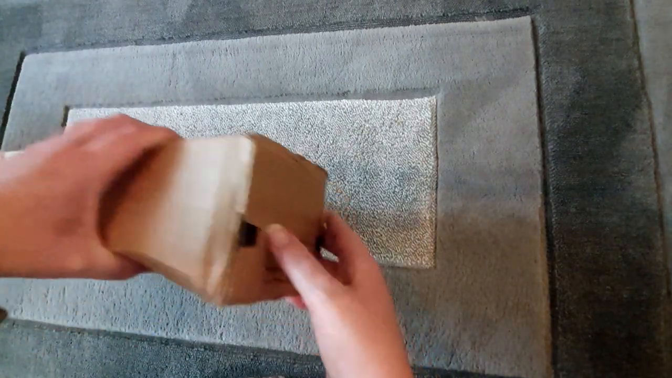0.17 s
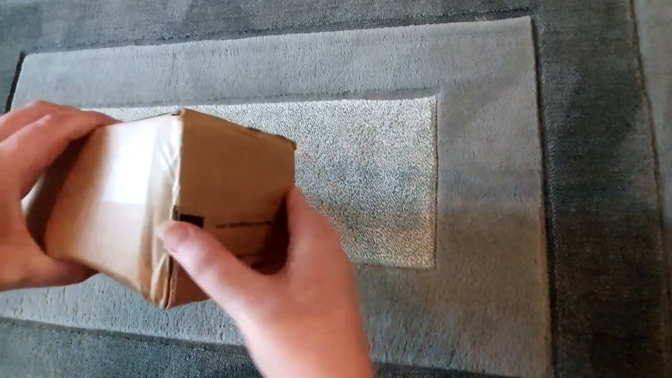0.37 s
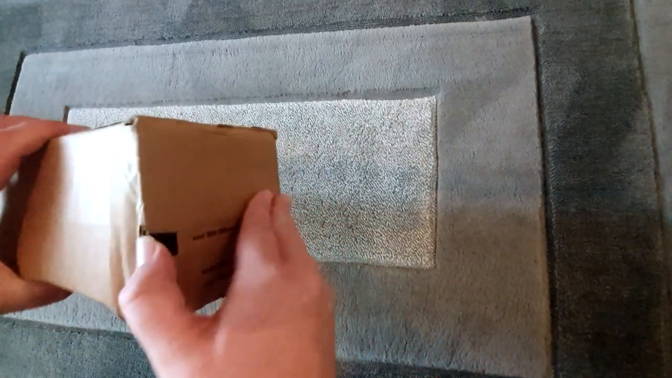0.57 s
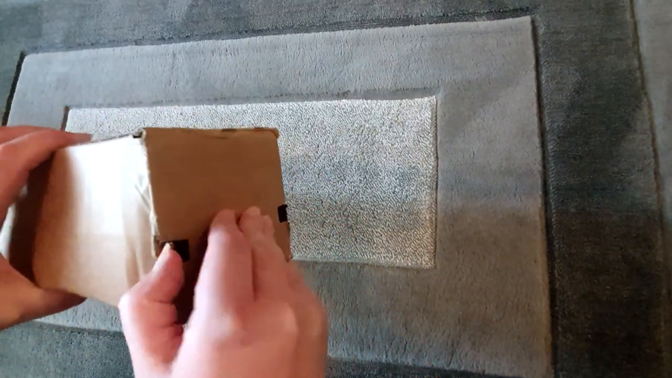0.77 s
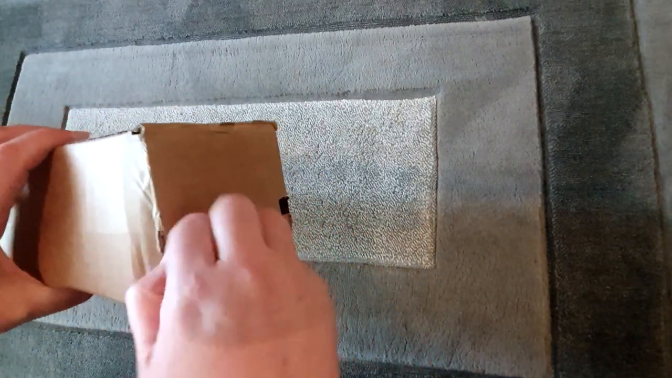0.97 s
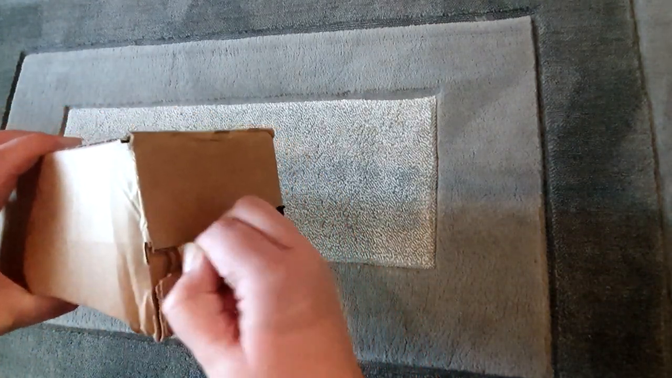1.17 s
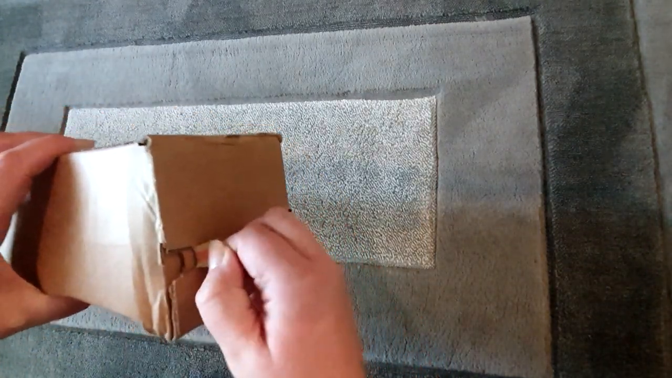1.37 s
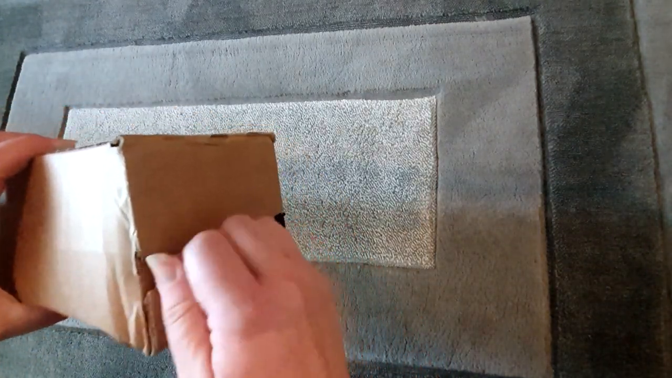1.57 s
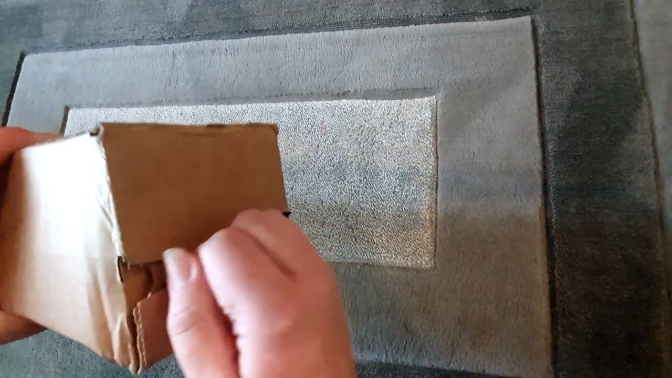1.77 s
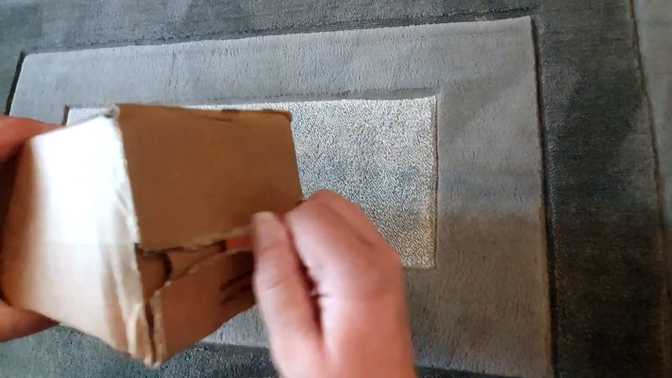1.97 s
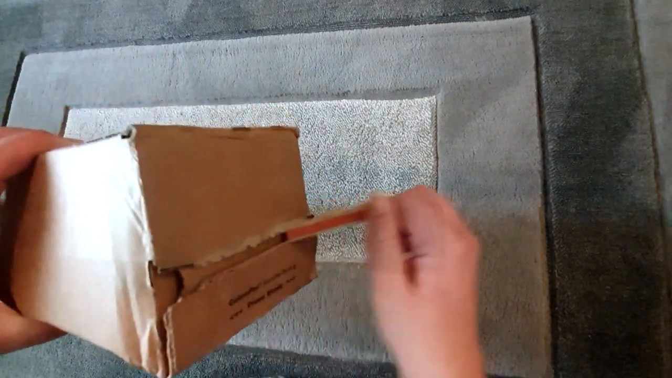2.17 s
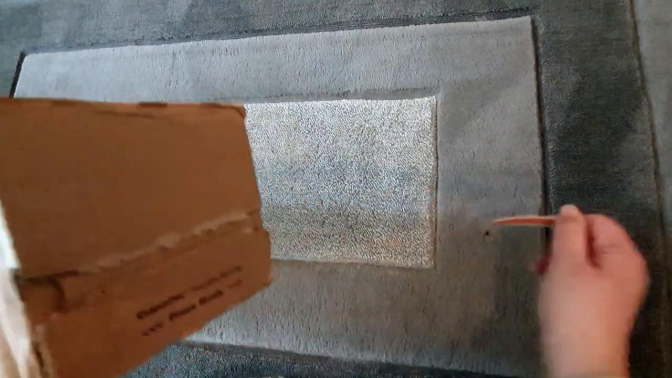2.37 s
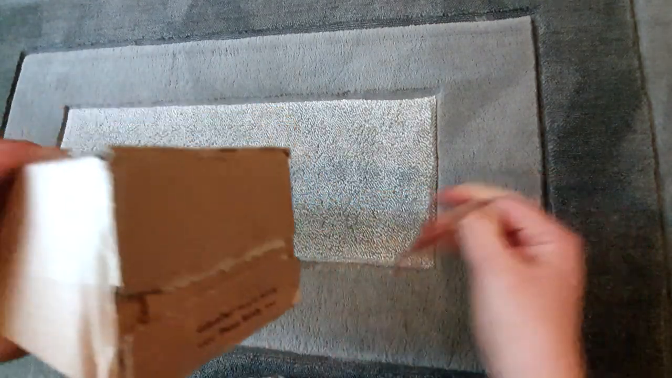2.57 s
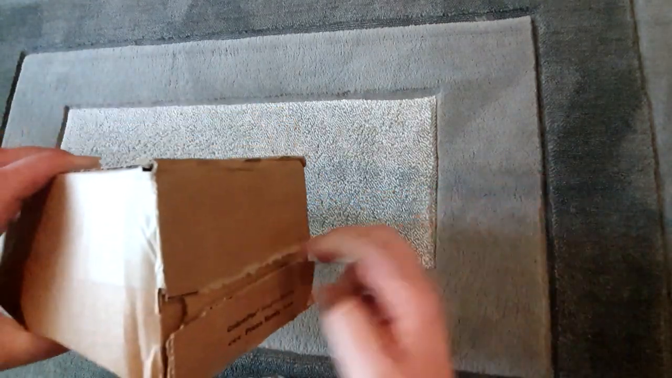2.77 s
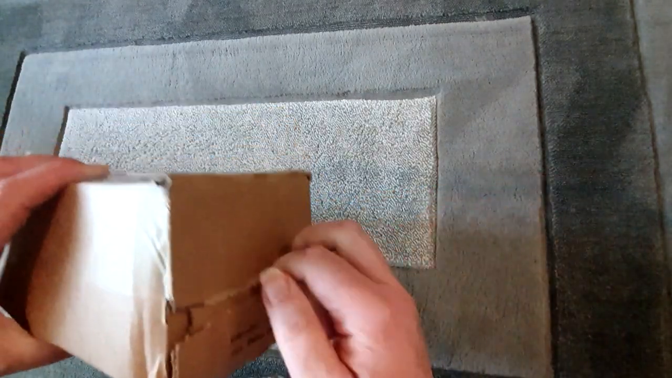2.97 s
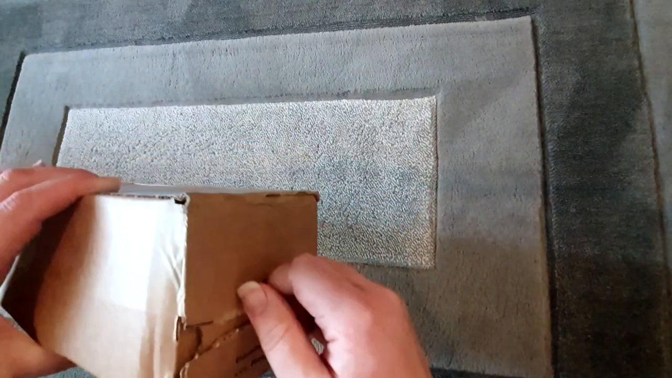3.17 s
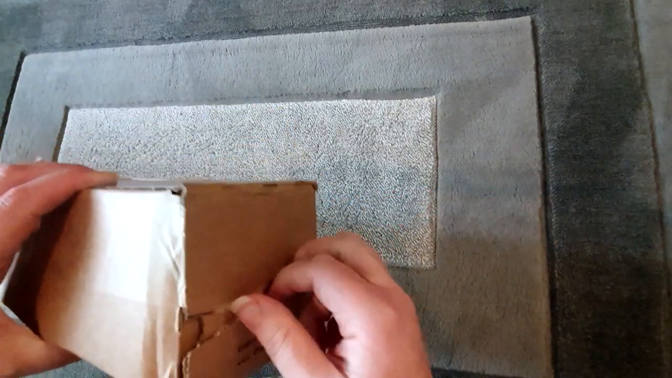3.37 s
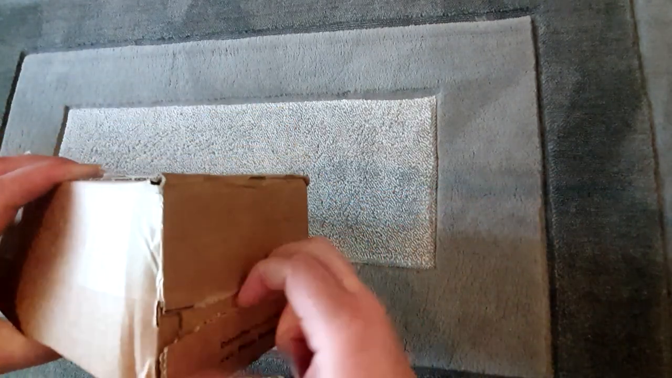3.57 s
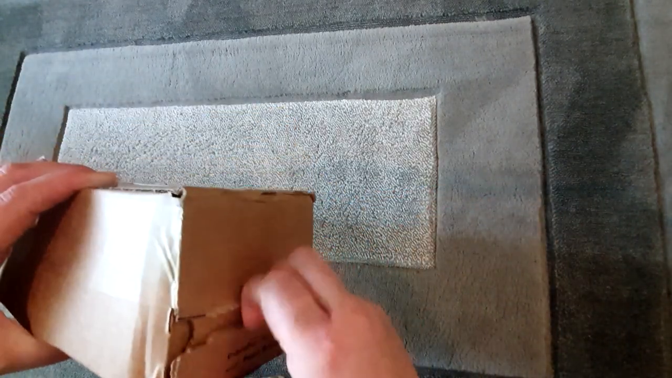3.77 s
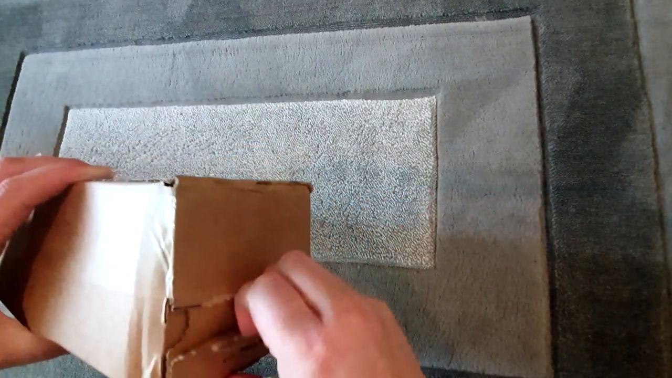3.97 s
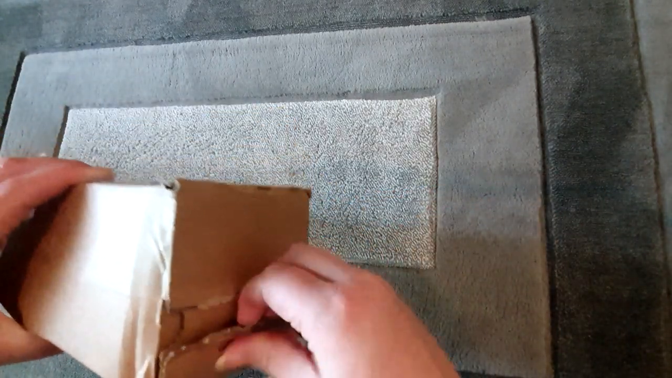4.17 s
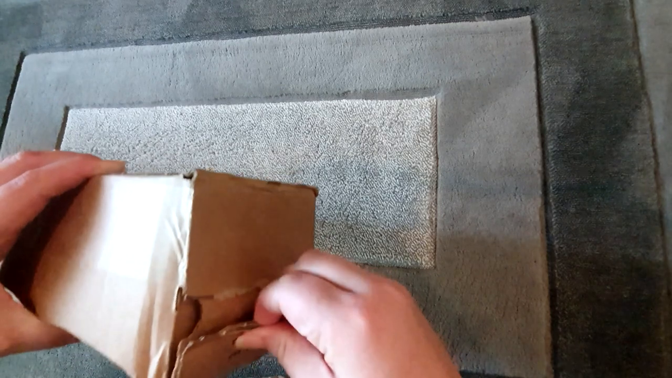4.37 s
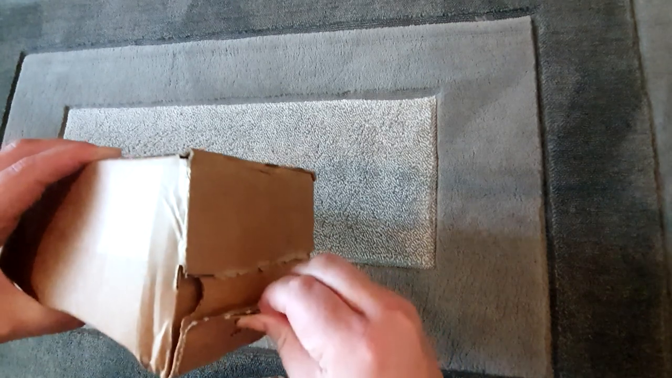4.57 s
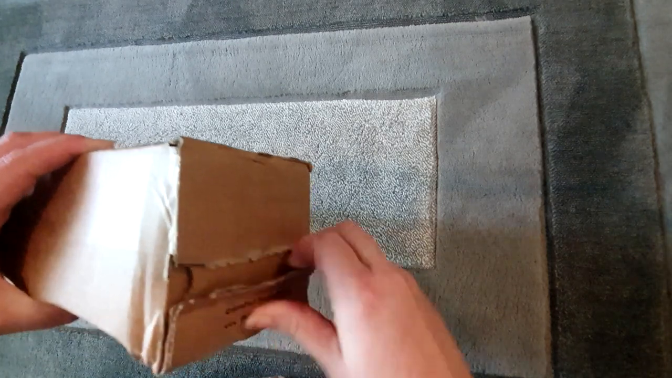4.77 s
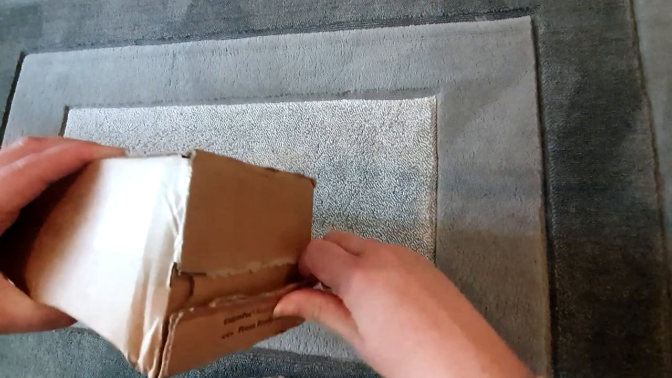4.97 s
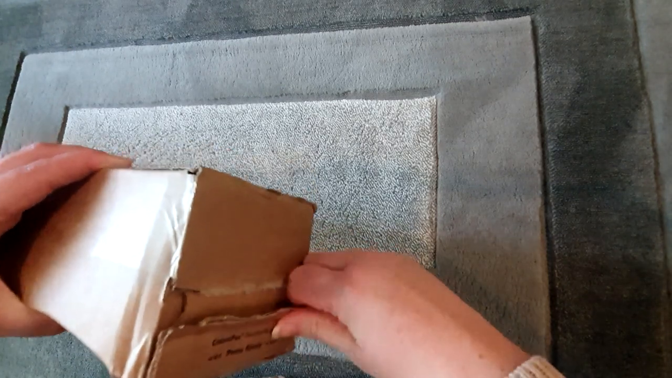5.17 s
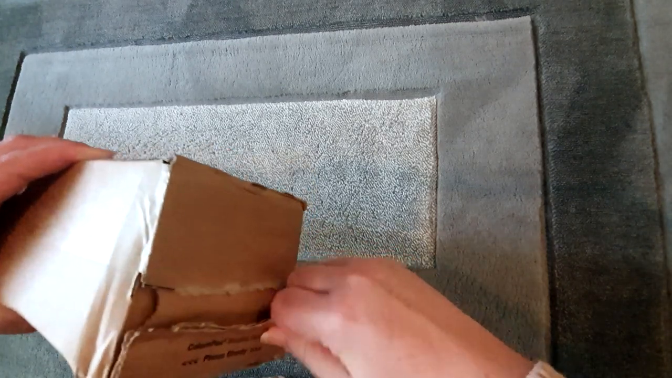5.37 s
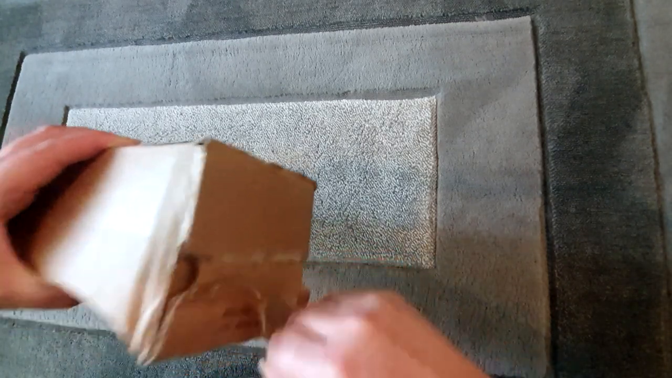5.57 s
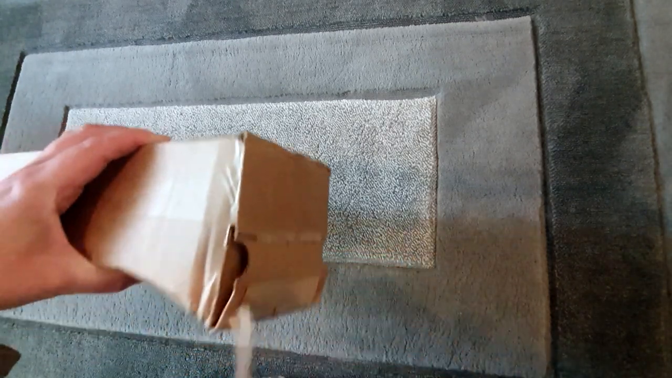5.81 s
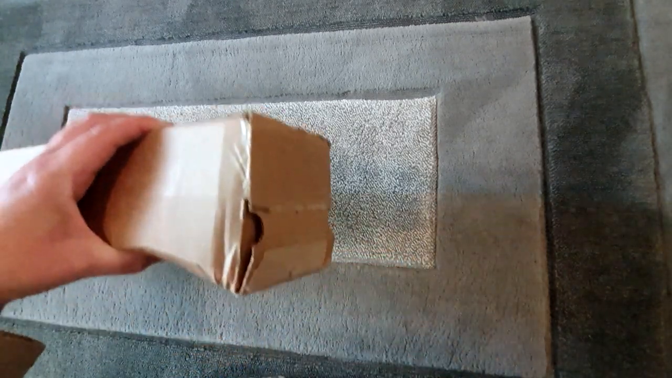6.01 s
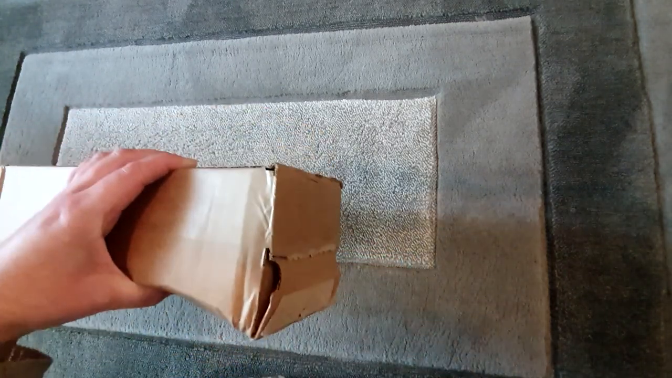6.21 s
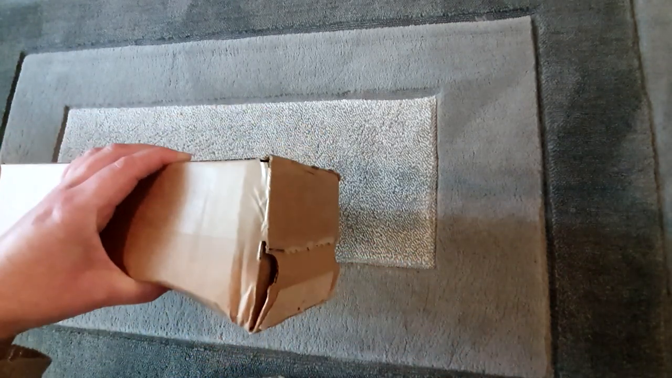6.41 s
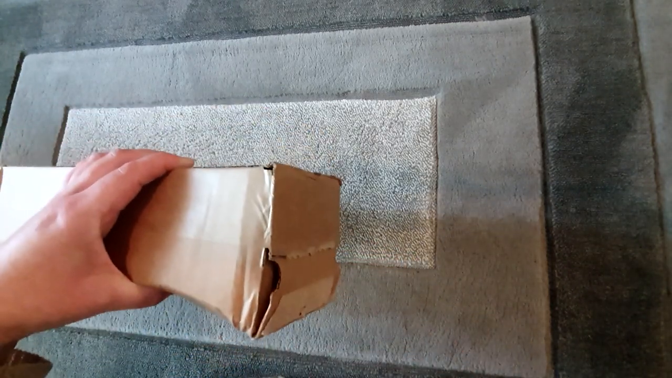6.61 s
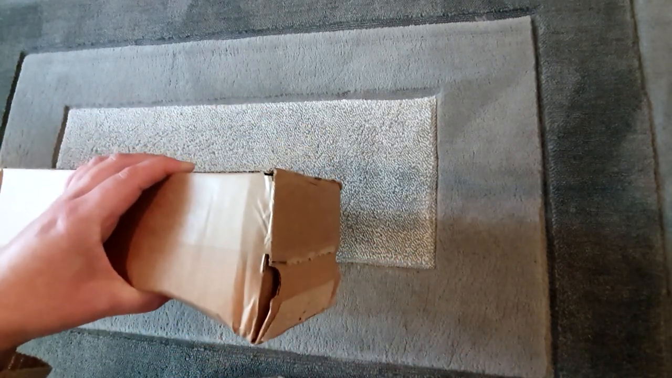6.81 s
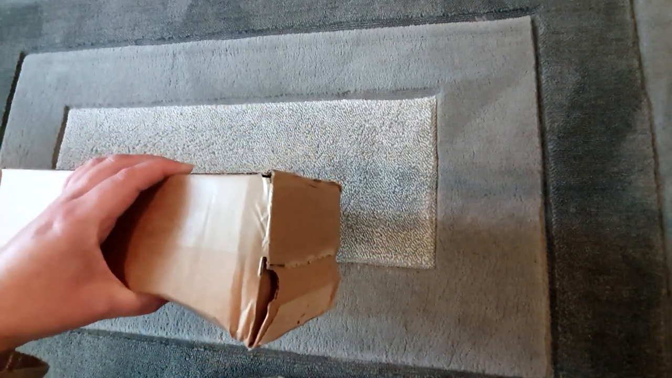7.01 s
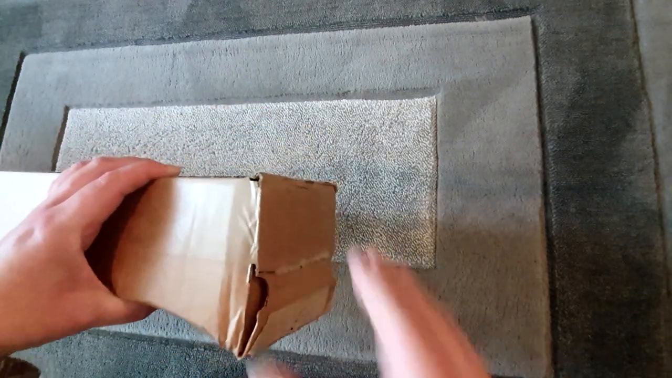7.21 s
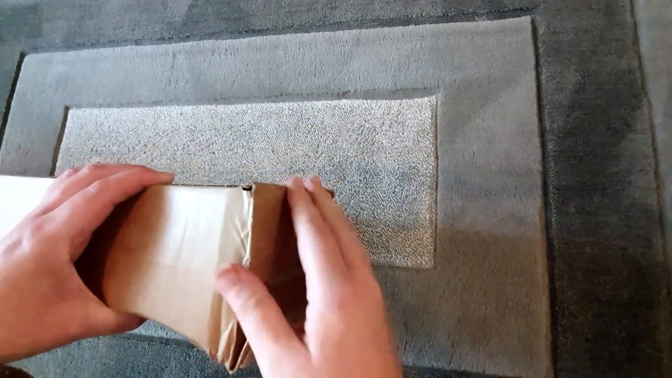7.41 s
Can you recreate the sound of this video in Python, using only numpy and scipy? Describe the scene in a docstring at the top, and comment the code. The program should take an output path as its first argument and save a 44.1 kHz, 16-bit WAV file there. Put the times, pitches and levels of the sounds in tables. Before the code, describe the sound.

Fingers tap and rustle on a hollow carton, a strip tears away in rapid drumming snaps, later two short crunchy rips follow.

```python
"""A small cardboard box is torn open by hand, close to two microphones: touches, a tear strip, two rips of the flap.
Breaking fibres are shaped noise: single snaps, dry ticks and a continuous crackle in clumps.
Snaps, jolts and scrapes excite the damped modes of the hollow box and its panels, which knock, thump and drum.
Low noise is the rumble of the grip; sparse decaying echoes are a small soft room over a faint hush of air."""
import sys
import numpy as np
from scipy import signal
from scipy.fft import rfft, irfft
from scipy.io import wavfile
from scipy.ndimage import uniform_filter1d

SR = 44100
rng = np.random.default_rng(int(sys.argv[2]) if len(sys.argv) > 2 else 0)


def to_wav(s):
    """Save 16-bit WAV."""
    ch = np.atleast_2d(s).T  # columns
    pcm = np.round(np.clip(ch, -1, 1) * 32767)  # PCM
    wavfile.write(sys.argv[1], SR, pcm.astype(np.int16))


N = 328545


def amp(db):
    """Logarithmic level: decibels become an amplitude ratio."""
    return 10 ** (np.asarray(db) / 20)


def evened(x):
    """Power normalisation: the signal is scaled to an rms of 1."""
    return x / np.sqrt(np.mean(x ** 2) + 1e-20)


def read(points, hz):
    """Logarithmic pitch: a table is interpolated along a log-frequency axis."""
    f, value = np.transpose(points)
    return np.interp(np.log(hz + 1), np.log(f + 1), value)


def add(mix, s, sound):
    """Superposition: a sound is summed into the mix at time s."""
    part = mix[..., round(s * SR):][..., :sound.shape[-1]]
    part += sound[..., :part.shape[-1]]


def colour(x, points):
    """Minimum-phase filtering: a spectrum is imposed that rings only after each click."""
    gain_db = np.maximum(read(points, abs(np.fft.fftfreq(4096, 1 / SR))), -100)
    # the Hilbert transform of the log gain supplies the phase
    response = np.exp(np.conj(signal.hilbert(np.log(amp(gain_db)))))
    taps = np.fft.ifft(response).real[:2048]
    return signal.oaconvolve(x, taps / np.linalg.norm(taps))[:len(x)]


def spread(count):
    """Partial coherence: noise for both ears shares a part, as the tear is spread along the edge."""
    shared, left, right = rng.standard_normal((3, count))
    return evened(np.array([shared + 2.6 * left, shared + 3.1 * right]))


# single snaps: start_s, crack_peak_db, panel_knock_peak_db, hollow_thump_peak_db, thump_pitch_hz
# (crack peak: before its tick and the dulling)
SNAP_EVENTS = [(0.0005, -37, -66, -28.5, 177), (0.0115, -22.5, -32, -21.5, 187),
               (0.548, -24, -36, -42.5, 271), (0.624, -37, -30.5, -41, 296), (0.8163, -23, -33, -38, 154),
               (0.9143, -40, -41, -44, 288), (0.9543, -57, -31, -31.5, 176), (0.98, -33, -51, -35, 277),
               (1.0218, -18.5, -19.5, -25, 258), (1.263, -71, -54, -45, 244), (1.352, -19, -27, -33.5, 192),
               (1.4553, -37, -34, -45.5, 150), (1.6261, -36, -56, -40, 303), (1.6753, -31, -33.5, -40, 308),
               (1.6931, -26, -30.5, -54.5, 298), (1.7878, -16.5, -25, -33.5, 404),
               (1.819, -16, -34, -27.5, 298), (1.834, -17, -20, -21, 295), (1.8737, -15, -27, -17, 148),
               (1.9, -14, -28, -21, 298), (1.929, -15, -29.5, -16.5, 290), (1.9905, -13.5, -33, -16.5, 300),
               (2.0765, -12, -18, -12.5, 334), (2.1921, -11.5, -17, -19.5, 285),
               (2.753, -37, -36.5, -32.5, 215), (2.9597, -54, -49, -43, 330), (3.247, -50, -56, -48, 157),
               (3.558, -54, -46.5, -52, 150), (3.7275, -38, -65, -49, 196), (3.767, -24, -29, -32.5, 335),
               (3.815, -50, -37, -43, 265), (3.9299, -23, -30, -32.5, 304),
               (3.9393, -14.5, -15, -15.5, 232), (4.0349, -39, -23, -25, 263),
               (4.2503, -46.5, -43, -40.5, 268), (4.279, -43, -34, -35.5, 315),
               (4.318, -36, -35.5, -39, 317), (4.339, -37, -30, -32, 263),
               (4.417, -38.5, -30.5, -38.5, 210), (4.4475, -48, -29, -35.5, 213),
               (4.4946, -50, -46.5, -50.5, 258), (4.563, -53, -34.5, -42.5, 193),
               (4.588, -38, -31.5, -34.5, 234), (4.5998, -37, -30.5, -39, 209),
               (4.6188, -44, -39, -35.5, 200), (4.646, -38, -28.5, -61, 221),
               (4.6593, -35.5, -32.5, -42.5, 326), (4.6795, -31, -40, -34, 325),
               (4.7714, -23, -35, -29.5, 235), (5.1865, -59, -41.5, -43.5, 278),
               (5.3551, -30.5, -46, -52, 159.4), (5.4878, -18, -36, -32, 220),
               (5.5335, -30, -46, -16.5, 168), (5.5494, -12.5, -22.5, -18, 158),
               (5.6753, -23, -51, -20.5, 159), (5.71, -16, -45, -24, 170.3), (5.7664, -15, -31, -45, 105),
               (6.104, -42, -56, -47, 290), (6.1165, -57.5, -60.5, -44, 280), (6.742, -43.5, -59, -53, 250),
               (7.3111, -45, -53.5, -47.5, 164), (7.3594, -62, -36.5, -47, 107)]
CRACK_MS, CRACK_SPREAD = 1.7, 0.5  # median time scale of a crack [ms]; scatter of its natural logarithm
TICK_DB = -9.5  # mean level of the tick at the front of a crack, relative to the crack
FLUTE_RING = 0.43  # share that rings on: the wall is damped less under the strip


def snaps():
    """Impulse excitation: a crack of fibres strikes the panels (knock) and the hollow (thump)."""
    cracks, knocks = np.zeros((2, N)), np.zeros(N)
    hz, t = np.transpose(BOX_MODES)[0], np.arange(8000) / SR
    # the board yields for part of a swing before it rings
    free = (1 - np.exp(-t * hz[:, None] / 0.58)) * blow()
    hollow = hz < HOLLOW_HZ
    # the holding fingers soak up the first swings
    soaked = np.exp(-t / np.where(hollow, 0.0045, 0.008)[:, None])
    for s, crack_db, knock_db, thump_db, thump_hz in SNAP_EVENTS + strip():
        on_strip = s in FLUTE_TIMES
        ms = CRACK_MS * np.exp(CRACK_SPREAD * rng.standard_normal())
        u = 1000 * t[:2000] / max(ms, 0.2)
        crack = fibre(spread(len(u)) * u * np.exp(-2 * u))
        front = amp(TICK_DB + 4.5 * rng.standard_normal()) * tick()
        add(cracks, s, amp(crack_db) * (crack / abs(crack).max() + front))

        modes = free * (soaked + (FLUTE_RING if on_strip else 0.11))
        # where the blow lands decides how hard each mode is shaken
        landing = amp(4 * rng.standard_normal(len(hz))) * rng.choice([-1, 1], len(hz))
        if on_strip:
            landing = abs(landing)  # the strip always tugs the wall the same way
        shake = landing * bend(hz, thump_hz, STRIP_DB_PER_OCTAVE if on_strip else 24.5)
        for db, part in ((knock_db, ~hollow), (thump_db, hollow)):
            ring = shake[part] @ modes[part]
            add(knocks, s, amp(db) * ring / abs(ring).max())
    return cracks, knocks


# moments at which the tear strip crosses a flute of the board: start_s
FLUTE_TIMES = [1.9497, 1.9669, 1.9792, 2.0015, 2.0118, 2.0238, 2.0375, 2.0529, 2.0641, 2.0855, 2.095,
               2.1025, 2.108, 2.118, 2.124, 2.1372, 2.1453, 2.1547, 2.162, 2.169, 2.178, 2.185, 2.2]
# two strongest notes of the hollow under the strip: low_pitch_hz, high_pitch_hz
FLUTE_NOTES = (156, 310)
STRIP_DB_PER_OCTAVE = 41  # steepness with which these notes stand out


def strip():
    """Repeated excitation: each flute crossed gives one snap at either note, with levels that glide."""
    count = len(FLUTE_TIMES)
    # first and last level [dB] of crack, knock and thump, scattered by 1 dB
    glides = (-14, -22), (-24, -25), (-16, -18)
    db = [np.linspace(*ends, count) + rng.standard_normal(count) for ends in glides]
    pitch_hz = np.where(rng.random(count) < 0.5, *FLUTE_NOTES)
    return list(zip(FLUTE_TIMES, *db, pitch_hz))


# modes of the box, hollow below and panels above HOLLOW_HZ: pitch_hz, relative_level_db, undamped_t60_s
BOX_MODES = [(84, -26, 0.067), (163, -5, 0.19), (197, -4, 0.16), (251, -1, 0.085), (301.6, 0, 0.12),
             (350, 1.5, 0.075), (425, 7, 0.029), (529, -2, 0.064), (611.7, 0.5, 0.05), (711.7, 10.5, 0.017),
             (1000, -14, 0.011), (1150, -6, 0.025), (1410, -7.5, 0.02), (1840, -12, 0.018),
             (2240, -13, 0.0084), (2750, -16.5, 0.012), (3580, -16.5, 0.012)]
HOLLOW_HZ = 450


def blow():
    """Modal decomposition: one blow sets off a decaying sine for each mode, a row each."""
    t = np.arange(8000) / SR
    hz, db, t60 = np.transpose(BOX_MODES)[:, :, None]
    return amp(db - 60 * t / t60) * np.sin(2 * np.pi * hz * t)


def bend(hz, pitch_hz, db_per_octave):
    """Resonance: the hollow answers most near the pitch to which the box is bent; panels do not care."""
    return amp(-db_per_octave * (hz < HOLLOW_HZ) * abs(np.log2(hz / pitch_hz)))


# spectrum of breaking paper: pitch_hz, relative_density_db_per_hz
FIBRE_SPECTRUM = [(530, -23), (1000, -7.5), (1780, -7), (2150, -10.5), (2650, -8.5), (3600, -9.5),
                  (7000, -14.5), (8350, -11.5), (12900, -14), (15700, -22.5)]


def fibre(pair):
    """Spectral shaping: noise for both ears takes on the colour of breaking paper."""
    return np.array([colour(ear, FIBRE_SPECTRUM) for ear in pair])


def tick():
    """Impulse radiation: a spike of a few samples, 0.21 ms in time constant, is broad in pitch."""
    u = 1000 * np.arange(2000) / SR / 0.21
    spike = fibre((spread(2000) + 3) * np.exp(-u))
    return spike / abs(spike).max()


# lone fibres that part with one dry tick: start_s, peak_level_db (before dulling), flake_pitch_hz
TICK_EVENTS = [(2.6266, -46.5, 2700), (2.908, -59, 3100), (3.923, -33, 4100), (3.9394, -7.5, 5800),
               (5.4, -42, 9000), (5.419, -40.5, 8000), (5.7534, -13.5, 10000), (5.7615, -18.5, 10500)]


def ticks():
    """Isolated fracture: each lone fibre parts in one tick and frees a ringing flake."""
    mix = np.zeros((2, N))
    for s, db, flake_hz in TICK_EVENTS:
        add(mix, s, amp(db) * flake(tick(), flake_hz))
    return mix


def flake(x, hz):
    """Damped oscillation: a freed flake of paper rings for a few swings; the peak is set to 1."""
    turns = hz * np.arange(400) / SR
    ring = 0.6 * np.sin(2 * np.pi * turns) * np.exp(-turns / 2.5)
    out = x + signal.oaconvolve(x, ring[None], axes=1)[:, :x.shape[1]]
    return out / abs(out).max()


# separate touches of the fingers: peak_s, rise_s, hold_s, crackle_db, drumming_db, rumble_db,
# dullness_db_per_octave
TOUCH_MOVES = [(0.0, 0.014, 0.049, -55, -45.5, -71, -1.5), (0.245, 0.0054, 0.0062, -52.5, -74.5, -75, 3.5),
               (0.363, 0.11, 0.022, -60, -63, -64, 1.5), (0.526, 0.074, 0.11, -50.5, -54.5, -78, 1.5),
               (0.774, 0.0092, 0.0095, -44.5, -48, -74, 0), (0.819, 0.0063, 0.018, -48, -52, -71, -1),
               (1.008, 0.024, 0.021, -47, -43.5, -47.5, 3.5), (1.152, 0.024, 0.0082, -49.5, -51.5, -57, -2),
               (1.357, 0.024, 0.012, -55.5, -46, -51.5, -0.5), (1.454, 0.046, 0.0049, -49.5, -47, -53, 0.5),
               (1.696, 0.065, 0.013, -37.5, -38.5, -63, 0.5), (2.545, 0.022, 0.0081, -58, -95, -79, -3),
               (2.762, 0.014, 0.0074, -54, -49, -47.5, 4), (2.983, 0.27, 0.1, -70.5, -64, -59, 1),
               (3.353, 0.033, 0.022, -57, -48.5, -54.5, 1.5), (3.937, 0.033, 0.071, -43.5, -43, -69, 1),
               (4.137, 0.19, 0.0041, -51.5, -52, -76, 2.5), (4.453, 0.048, 0.0056, -63.5, -54.5, -67, 7.5),
               (4.611, 0.054, 0.081, -59.5, -48.5, -75, 7), (4.727, 0.057, 0.061, -42, -48, -71, 1),
               (4.929, 0.061, 0.018, -55, -64, -82, 1), (5.3, 0.19, 0.14, -54, -55, -91, 2),
               (6.1, 0.014, 0.0063, -52, -58, -55, -1.5), (6.467, 0.054, 0.015, -60, -65.5, -53.5, 1),
               (6.738, 0.13, 0.05, -66, -60, -54, 3.5), (7.323, 0.0095, .14, -56.5, -54.5, -50, 5.5)]
# the strip, then two rips of the flap, each: time_s, crackle_db, drumming_db, rumble_db,
# dullness_db_per_octave
TEAR_MOVES = [
    [(1.77, -47.5, -44.5, -46, 7), (1.79, -36.5, -38, -47.5, 0.5), (1.828, -31.5, -32, -40, 1),
     (1.922, -39.5, -37.5, -33, 2), (1.997, -31.5, -22.5, -32, 1), (2.06, -37.5, -24.5, -25.5, -0.2),
     (2.12, -41.5, -16.5, -36, -3), (2.203, -34, -31.5, -43, 0)],
    [(5.468, -54, -52.5, -66, -2), (5.496, -36, -41, -62, 0.5), (5.535, -30, -41, -27.5, -0.5),
     (5.563, -36.5, -38, -33, -1)],
    [(5.635, -59.5, -55.5, -48, 5.5), (5.657, -29.5, -40, -43, -2), (5.713, -35.5, -35, -28, -0.5),
     (5.763, -24.5, -36.5, -35.5, -2.5), (5.797, -30, -35, -39.5, 1), (5.811, -40.5, -44, -38, 0)],
]
# the holding hand shifts on the paper throughout; same columns as the tears
HOLD_MOVES = [(0.0, -66.5, -66, -60, 6.5), (0.45, -62, -60.5, -82, 2.5), (1.1, -62.5, -60.5, -74, 0),
              (1.3, -84, -75.5, -64, -1), (1.55, -69, -61, -67, 5.5), (2.4, -74.5, -69, -65.5, 3.5),
              (2.74, -74.5, -87.5, -84.5, -1), (3.1, -75.5, -68.5, -80, 3), (3.9, -60.5, -57, -81, 3.5),
              (4.25, -68.5, -60.5, -63, 2), (4.54, -81, -74.5, -65.5, 12), (5.07, -70, -66, -76, 4.5),
              (5.95, -63.5, -70, -58.5, 1), (6.55, -71.5, -80, -69, 1.5), (6.85, -75, -70.5, -62, 5),
              (7.07, -99, -90, -73.5, 5), (7.45, -60.5, -69, -54, 4.5)]
# decay once the fingers stop: crackle, drumming and rumble, each in db_per_s
FALL_RATES = [322, 303, 219]
RISE_DB = 19.5  # gained over the rise of a touch


def work():
    """Addition of powers: all moves sum to crackle, drumming, rumble [dB] and dullness; the loudest leads."""
    moves = []
    for s, rise, hold, *rest in TOUCH_MOVES:
        quiet = (s - rise, *np.subtract(rest[:3], RISE_DB), rest[3])
        moves.append([quiet, (s, *rest), (s + hold, *rest)])
    t = np.arange(0, N + 64, 64) / SR
    power, dull = np.zeros((3, len(t))), np.zeros(len(t))
    for rows in map(np.array, moves + TEAR_MOVES + [HOLD_MOVES]):
        *db, tilt = (np.interp(t, rows[:, 0], column) for column in rows.T[1:])
        fall_db = np.outer(FALL_RATES, np.maximum(t - rows[-1, 0], 0))
        gain = (t >= rows[0, 0]) * amp(db - fall_db) ** 2
        power += gain
        dull += gain[0] * tilt
    curves = (*10 * np.log10(power), dull / power[0])
    return [np.interp(np.arange(N) / SR, t, curve) for curve in curves]


def running():
    """Gating: 1 while the strip is being pulled, else 0, with soft ends."""
    t = np.arange(N) / SR
    pull = TEAR_MOVES[0]
    return uniform_filter1d(1. * (t > pull[0][0]) * (t < pull[-1][0]), size=2000)


def breaks(per_s, spread_db, burst_s):
    """Shot noise: fibres let go at random moments with unequal strength, each a short swell."""
    size = amp(spread_db * np.minimum(rng.exponential(1, N), 4)) * (rng.random(N) < per_s / SR)
    t = np.arange(600) / SR / burst_s
    return evened(signal.oaconvolve(size, t * np.exp(-2 * t))[:N])


def tearing(crackle_db):
    """Stick-slip fracture: a light touch mostly rubs, a hard pull breaks fibres in clumps."""
    share = np.clip((crackle_db + 66.5) / 54.0, 0.3, 1)
    clumps = share * breaks(per_s=400.0, spread_db=3.5, burst_s=0.0023) + (1 - share) + 0.2
    return clumps / np.sqrt(uniform_filter1d(clumps ** 2, 4000))


def crackle(clumps, crackle_db):
    """Amplitude modulation: clumps of breaking fibres modulate the hiss of skin on paper."""
    return amp(crackle_db) * np.array([evened(ear) for ear in fibre(clumps * spread(N))])


def dulled(x, dull):
    """Spectral tilt: hands cover or bare the paper; patches of the spectrum swell and fade."""
    hz, t, z = signal.stft(x, SR, nperseg=256)
    dull_db = np.interp(t, np.arange(N) / SR, dull)
    patches = uniform_filter1d(rng.standard_normal(z.shape[1:]), size=7, axis=0)
    patches = evened(uniform_filter1d(patches, size=5, axis=1))
    gain_db = 2.4 * patches - dull_db * np.log2((hz[:, None] + 300) / 4000)
    return signal.istft(z * amp(gain_db), SR, nperseg=256)[1][:, :N]


def walls(clumps, drum_db):
    """Forced vibration: the same clumps jolt the walls, whose pitch drifts from snap to snap."""
    jolts = clumps * rng.standard_normal(N) * amp(drum_db)
    modes, hz, edge = blow(), np.transpose(BOX_MODES)[0], running()
    # under the strip the two notes stand out and the panels are 7.5 dB down
    notes = np.maximum(*(bend(hz, note, STRIP_DB_PER_OCTAVE) for note in FLUTE_NOTES))
    notes = notes * amp(-7.5 * (hz > HOLLOW_HZ))
    snap_rows = np.array(SNAP_EVENTS)
    pitch_hz = np.interp(np.arange(N) / SR, snap_rows[:, 0], snap_rows[:, 4])
    shares = np.array([bend(f, pitch_hz, db_per_octave=1.5) for f in hz])
    shares = shares * (1 - edge) + notes[:, None] * edge
    shares /= np.sqrt((modes ** 2).sum(1) @ shares ** 2)
    return signal.oaconvolve(jolts * shares, modes, axes=1).sum(0)[:N]


# brief scrapes of a nail or a torn edge over the board: middle_s, length_s, stroke_level_db
SCRAPE_STROKES = [(4.124, 0.022, -40.5), (6.03, 0.11, -62), (6.109, 0.029, -51.5), (6.327, 0.2, -62.5),
                  (6.457, 0.06, -63)]


def scrapes():
    """Friction: quick uneven slips ring only the smallest panels (over 1600 Hz), damped by the finger."""
    t = np.arange(N) / SR
    stroke = np.zeros(N)
    for s, length, db in SCRAPE_STROKES:
        stroke += amp(db) * np.cos(np.pi * np.clip((t - s) / length, -0.5, 0.5)) ** 2
    slips = (breaks(per_s=900.0, spread_db=-7.0, burst_s=0.0015) + 0.36) * spread(N) * stroke
    ring = blow()[np.transpose(BOX_MODES)[0] > 1600].sum(0) * np.exp(-t[:8000] / 0.00088)
    return signal.oaconvolve(slips, ring[None] / np.linalg.norm(ring), axes=1)[:, :N]


# spectrum of the rumble of the grip: pitch_hz, relative_density_db_per_hz
GRIP_SPECTRUM = [(40, -12.5), (65, 1.5), (84, 6.5), (120, -17), (300, -56.5)]


def grip(rumble_db):
    """Low-frequency noise: the held box shudders in the deep bass, much alike at both ears."""
    a, b = rng.standard_normal((2, N))
    low = np.array([colour(a, GRIP_SPECTRUM), colour(evened(a + 0.4 * b), GRIP_SPECTRUM)])
    return amp(rumble_db) * low / np.sqrt(uniform_filter1d((low ** 2).mean(0), size=6000))


# how the pair hears the box outside the strip pull: pitch_hz, left_lead_rad, left_minus_right_db
BOX_PORTS = [(60, 0.0072, 0), (150, 0.28, 1), (314, 0.88, 3), (660, 0.1, 4), (2500, 0.92, 4.5),
             (14000, 0.8, 3.5)]
# how the pair hears the box while the strip runs; same columns
STRIP_RUN_PORTS = [(70, 1.9, -1.5), (160, 2.2, -6), (302, 0.99, 5.5), (700, 1.4, 0), (3000, 1.2, 4.5),
                   (9000, 0.8, -2.5)]


def ports(x, table):
    """Interaural difference: the two microphones hear a lead and a lean that change with pitch."""
    hz, rows = np.fft.rfftfreq(N, 1 / SR), np.array(table)
    # each ear takes half of the difference, in opposite senses
    half = amp(read(rows[:, [0, 2]], hz) / 2) * np.exp(0.5j * read(rows[:, :2], hz))
    return irfft(rfft(x) * [half, 1 / half], N)


# decay of the room: pitch_hz, t60_s
ROOM_DECAY = [(100, 0.3), (15000, 0.12)]
ROOM_DB = -10.5  # level of the echoes relative to the box


def room(x):
    """Reverberation: sparse echoes of random sign, other ones per ear, each band dying at its own speed."""
    taps = np.zeros((2, SR // 2))
    start = np.arange(100, SR // 2 - 20, 20)
    at = start + rng.integers(0, 20, (2, len(start)))  # one echo in every 20 samples
    np.put_along_axis(taps, at, rng.choice([-1., 1.], at.shape), 1)
    hz, t, z = signal.stft(taps, SR, nperseg=256)
    decay = amp(-60 * t / read(ROOM_DECAY, hz)[:, None])
    tail = signal.istft(z * decay, SR, nperseg=256)[1]
    return signal.fftconvolve(x[None], tail / np.linalg.norm(tail[0]), axes=1)[:, :N]


# spectrum of the hush: pitch_hz, relative_density_db_per_hz
AIR_SPECTRUM = [(59, -35.5), (100, -14), (910, -22.5), (2080, -28), (11900, -41.5), (16000, -54.5)]
AIR_DB = -78.5


def air():
    """Diffuse noise: the faint hush of the room is independent at each ear."""
    return amp(AIR_DB) * np.array([colour(v, AIR_SPECTRUM) for v in rng.standard_normal((2, N))])


def scene():
    """Superposition: the box, its echoes, the grip and the hush are summed."""
    crackle_db, drum_db, rumble_db, dull = work()
    clumps = tearing(crackle_db)
    cracks, knocks = snaps()
    paper = dulled(crackle(clumps, crackle_db) + cracks + ticks(), dull)
    box = paper + walls(clumps, drum_db) + knocks + scrapes()
    near, pulled = box + grip(rumble_db), running()
    direct = ports(near * (1 - pulled), BOX_PORTS) + ports(near * pulled, STRIP_RUN_PORTS)
    return direct + amp(ROOM_DB) * room(box.mean(0)) + air()


def record(dry):
    """Band limitation: the microphones lose bass below 52.7 Hz; treble ends near 16.1 kHz."""
    bass_cut = signal.butter(N=3, Wn=52.7, btype="high", fs=SR, output="sos")
    thin = signal.sosfilt(bass_cut, dry)
    treble_cut = signal.firwin(511, 16100, window=("kaiser", 9), fs=SR)
    return signal.oaconvolve(thin, treble_cut[None], "same")


dry = scene()
out = record(dry)
to_wav(out)
```